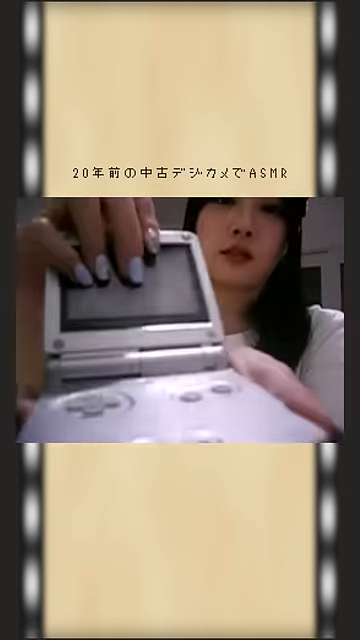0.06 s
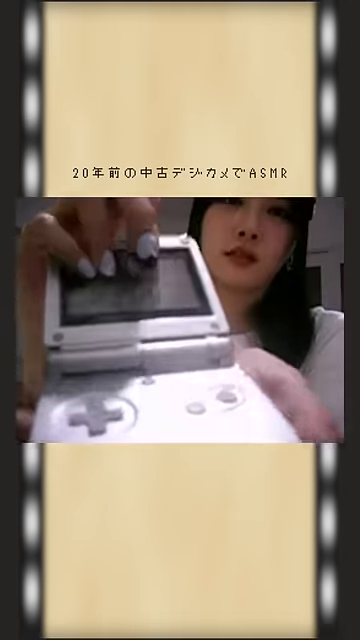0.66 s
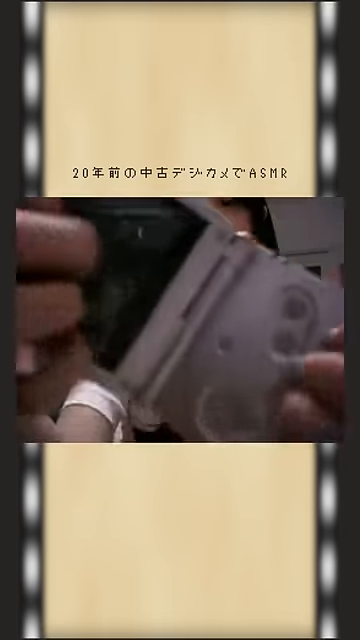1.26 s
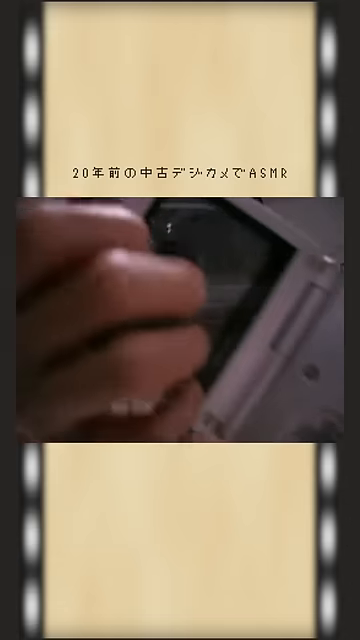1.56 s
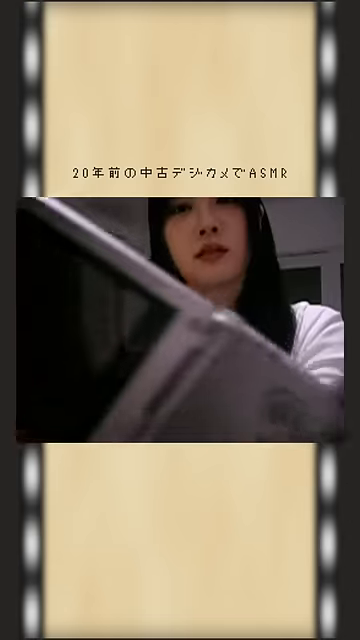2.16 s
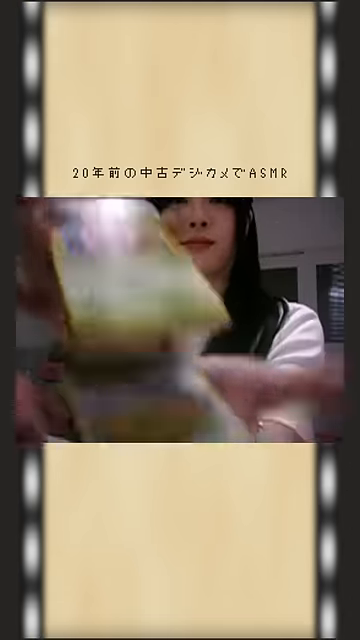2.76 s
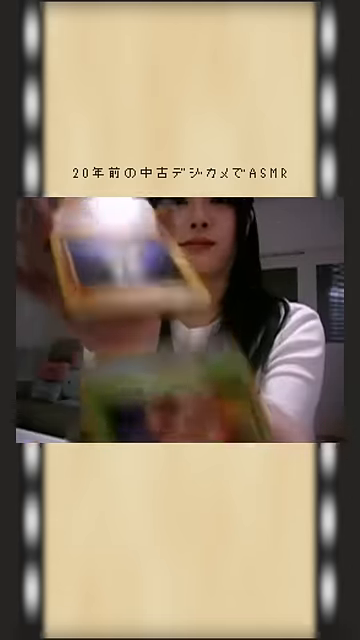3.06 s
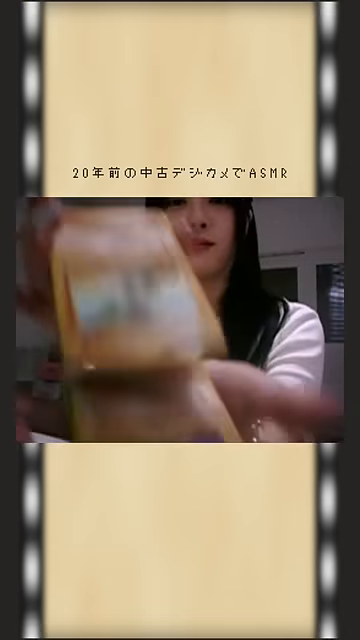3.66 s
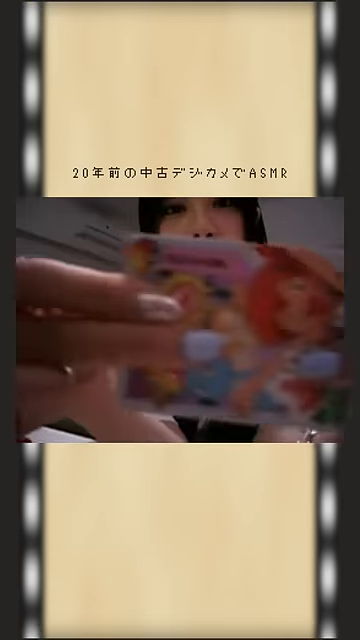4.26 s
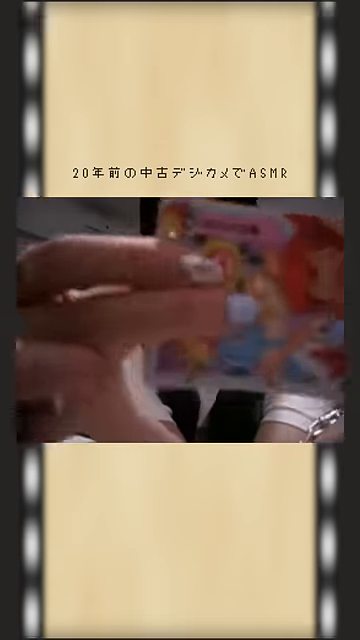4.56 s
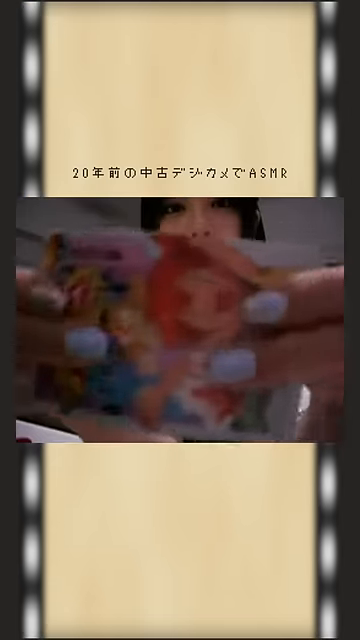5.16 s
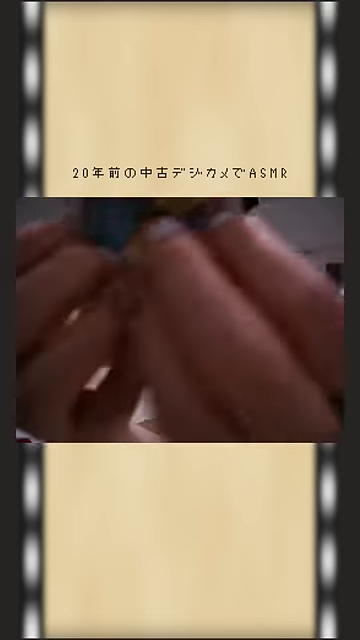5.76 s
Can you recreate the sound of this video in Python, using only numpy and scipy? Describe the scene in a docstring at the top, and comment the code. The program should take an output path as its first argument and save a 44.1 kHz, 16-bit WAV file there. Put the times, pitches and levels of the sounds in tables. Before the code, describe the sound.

Close, muffled hinge snaps and quick nail taps on plastic, then soft card slides and five loud pops of a bending plastic card.

```python
"""Taps, snaps and pops of plastic

Close to an old camera, a handheld game console's lid snaps twice in its hinge and long fingernails tap
the shell; each impact excites damped modes. Trading cards slide off a stack with a swish of friction,
a thin plastic card is flexed until it buckles in five loud pops, and nails click again.
The camera passes little above 4 kHz and adds its own hiss and hum."""
import sys
import numpy as np
from scipy import signal
from scipy.fft import rfft, irfft
from scipy.io import wavfile

SR = 44100
rng = np.random.default_rng(int(sys.argv[2]) if len(sys.argv) > 2 else 0)


def put_to_file(sound):
    """Save the sound as 16-bit audio at rate SR, in the file named by the first command-line argument."""
    columns = np.atleast_2d(sound).T  # one column per channel
    safe = np.clip(columns, -1, 1)
    whole_steps = np.round(safe * 32767)
    wavfile.write(sys.argv[1], SR, whole_steps.astype(np.int16))


N = 256220

# Spectra of the camera's hiss and the hands' rumble: (frequency [Hz], relative density [dB])
HISS_SPECTRUM = [(53, -42.5), (90, -2), (164, -4), (224, -1), (277, -4.5), (359, 0), (416, -6), (604, -4),
                 (1000, -15), (1360, -14.5), (1530, -12), (2370, -9), (2880, -6.5), (3560, -8), (4400, -27),
                 (5720, -72), (9680, -120)]
RUMBLE_SPECTRUM = [(5, -9), (15, 5), (35, -1), (60, -10.5), (130, -16.5), (250, -36), (600, -57),
                   (2000, -92)]
# Tones of the camera's hum: (frequency [Hz], rms level [dB])
HUM_TONES = [(220, -54), (361, -57), (2890, -60), (3130, -60), (3440, -61)]
# Envelope of the rumble: (time [s], relative level [dB])
RUMBLE_ENVELOPE = [(0.0, -45.5), (2.3, -40), (2.62, -48.5), (3.57, -50.5), (4.59, -52), (5.32, -53.5),
                   (5.81, -47)]
# Nail taps: (time [s], relative level [dB], click centre [Hz], panel clack [dB], case knock [dB])
# Clack and knock are relative to the click: near 0 for a square hit, far below for a glancing one.
NAIL_TAPS = [(0.3435, -25.5, 3000.0, -20.5, -20.5), (0.345, -18.5, 2820, -17.5, -26.5),
             (0.6904, -27.5, 3300.0, -20.0, -21.5), (0.7018, -27.5, 2550.0, -24, -27),
             (0.787, -30, 2900.0, -36, -7.5), (0.7942, -17.5, 3150.0, -7.5, -16.5),
             (0.9723, -24.0, 3200.0, -9.5, -17.5), (0.9836, -24.5, 2250.0, -12, -11.5),
             (1.0045, -22, 2490, -18.5, -12.5), (1.0336, -21, 2610, -7.5, -10),
             (1.0916, -21.5, 2960, -18.5, -18), (1.105, -27, 3300.0, -3, -9),
             (1.1566, -25.0, 2350.0, -11, -12.5), (1.166, -25, 2700, -14.5, -19),
             (1.196, -19.5, 2550.0, -6, -10.5), (1.2215, -18.5, 3010, -6, -20.5),
             (1.2323, -12.5, 2400.0, -22.5, -7.5), (1.2935, -23.0, 3400.0, -3.5, -7),
             (1.3162, -23.5, 2900, -21.5, -17.5), (1.3838, -23.5, 2530, -17, -9),
             (1.407, -15, 2850.0, -8, -9), (1.4106, -16, 2470, 1, -2), (1.4526, -21, 3050.0, -7, -10),
             (1.4734, -22.5, 3250.0, -2.5, -6), (1.5413, -21.5, 2700.0, -17, -10.5),
             (1.592, -18, 2900.0, -10.5, -8), (1.603, -14.5, 2370, -3.5, -6.5),
             (1.6595, -21.5, 2850.0, -4.5, -13), (1.6625, -20, 3200, -10.5, -11),
             (1.6666, -18.5, 2920, -10.5, -8.5), (1.7323, -22, 2800.0, -10.5, -7.5),
             (1.792, -17.5, 2750.0, -17.5, -10.5), (1.7983, -16.0, 2950.0, -4, -7),
             (1.8026, -21, 2980, -29.5, -19), (1.8582, -20.5, 3400, -7.5, -9),
             (1.8844, -26, 3050.0, -10.5, -10.5), (1.9048, -27.5, 3000.0, -14.5, -7),
             (1.9689, -23, 2870, -11.5, -14), (2.0151, -24.0, 2450.0, -24, -20),
             (2.0163, -13.5, 2700, -10, -14), (2.0186, -19, 3230, -12.5, -15.5),
             (2.0982, -25.5, 3550.0, -5.5, -8), (2.1341, -19.5, 3270, -6.5, -13.5),
             (2.1387, -27.0, 2720, -12, -6.5), (2.1548, -25, 2700.0, -6, -10),
             (2.2342, -15.5, 2555, -22, -16.5), (2.2914, -30, 3450.0, -6, -7),
             (2.3262, -30.5, 2900, -41, -27.5), (2.3763, -14, 2700.0, -16, -11.5),
             (2.4171, -32, 3200.0, -11.0, -6), (2.4385, -25, 3600, -11, -23.0),
             (2.4435, -16.5, 2570, -8.0, -10.5), (2.4534, -19.5, 2410, -2.5, -8),
             (5.737, -16, 2750.0, -17, -22), (5.737, -23, 2900, -25, 2.5), (5.742, -26, 2900, -13, -6),
             (5.7509, -18, 2450.0, -20, -8), (5.8034, -19, 2690, -20.0, -6)]
# Modes of the hand-damped shell and of the lid: (frequency [Hz], level [dB], T60 [s])
SHELL_MODES = [(305, -5.5, 0.013), (480, 0, 0.047), (740, -1.5, 0.011), (980, -6.5, 0.006),
               (1480, 6, 0.0082), (1780, 1.5, 0.0065), (2250, 1, 0.0065), (2450, 6.5, 0.0066),
               (3070, 2, 0.019), (3113, 0.5, 0.0095), (3400, 10.5, 0.011), (3860, -5, 0.0028)]
LID_MODES = [(420, -0.5, 0.01), (760, 1, 0.014), (1050, -3.5, .008), (1491, -2.5, .011),
             (1720, -1.5, 0.0039), (2180, -0.5, 0.01), (2616, 4, 0.012), (3060, -2, .009),
             (3470, -0.5, 0.0062), (3540, 2, .011), (4210, -1.5, 0.013)]
# Hinge contacts: (time [s], level [dB], click centre [Hz], lid clack [dB re click])
HINGE_CONTACTS = [(0.4378, -14.5, 3500, -4), (0.4384, -7, 3367, -5.5), (0.4404, -17.5, 3000, -12.5),
                  (0.4477, -22.5, 3367, -13.5), (0.8174, -10.5, 2884, -12.5), (0.8192, -6.5, 2950, -12),
                  (0.828, -25.5, 3100, -14)]
# Thin ticks: (time [s], relative peak [dB])
TICK_EVENTS = [(.9622, -28), (2.497, -36.5), (3.9483, -20), (5.7334, -10)]
# A faint nail tap, then card slides with light clicks:
# (mid time [s], half length [s], swish [dB], click [dB], clack [dB re click])
TAP_THEN_SLIDES = [(2.499, 0.0047, -47, -32.5, -25), (2.565, 0.0076, -38.5, -35.5, -8),
                   (2.6315, 0.019, -45.5, -24.5, -21), (2.84, 0.004, -43.5, -37, -21),
                   (2.8492, 0.012, -31, -27, -11), (3.1637, 0.0082, -32.5, -33.5, -20.5),
                   (3.41, 0.04, -40, -37, -22.5), (3.555, 0.0034, -41, -39.5, -20),
                   (3.616, 0.0058, -41, -36.5, -21), (3.7403, 0.004, -41, -35, -11.5),
                   (3.75, 0.015, -30, -28.5, -8), (3.927, 0.028, -37, -36, -18)]
# Spectrum of the friction: (frequency [Hz], relative density [dB])
FRICTION_SPECTRUM = [(500, -11), (1300, -32), (2200, -20), (3100, 14.5), (3700, 2.5), (5000, -19)]
# Loud and faint pops: (time [s], peak [dB], cutoff [Hz], pitch from tension [ratio], twisting mode [dB])
CARD_POPS = [(4.1397, -0.5, 2400, 1.0, -19), (4.2938, -30.5, 342, 1.0, -20), (4.351, -34, 300, 1.0, -21),
             (4.4989, 1, 3080, 1.04, -4), (4.678, -31, 451, 1.0, -23), (4.8817, -3, 1950, 0.98, -8),
             (5.045, -43, 400, 1.0, -22), (5.252, -1.5, 3970, 0.956, -21), (5.6326, -6.5, 1400, 0.97, -9)]
# Modes of the flexed card: (frequency [Hz], level [dB], T60 [s])
CARD_MODES = [(143, -12, 0.015), (270, -2, 0.023), (402, -2, 0.021), (464, 2, 0.023), (880, -14, 0.0062),
              (1216, -3.5, 0.012), (1560, -8, 0.015), (1910, -2.5, 0.011), (2440, 4, 0.011),
              (3400, 1, 0.0073)]
# Spectrum of the room's reflections: (frequency [Hz], relative level [dB])
ROOM_SPECTRUM = [(100, -13.5), (900, 3), (1600, 0), (3200, 2), (4500, -3)]
LIGHT_CLICK_HZ = 2990


def amp(db):
    """Amplitude grows tenfold for every 20 dB."""
    return 10 ** (np.asarray(db) / 20)


def unit_rms(x):
    """Normalisation brings the mean power to 1."""
    return x / np.sqrt(np.mean(x ** 2) + 1e-20)


def add(mix, start_s, sound):
    """Superposition: a sound adds to the mix from its start time on."""
    part = mix[max(round(start_s * SR), 0):][:len(sound)]
    part += sound[:len(part)]


def coloured(x, spectrum):
    """Linear filtering weights each frequency by the spectrum; the result has rms 1."""
    hz, db = np.transpose(spectrum)
    f = np.fft.rfftfreq(len(x), 1 / SR)
    gain = amp(np.interp(np.log(f + 1), np.log(hz + 1), db))
    return unit_rms(irfft(rfft(x) * gain, len(x)))


def drift(step_s):
    """Interpolation between random values gives a slow fluctuation of rms 1."""
    knots = np.arange(0, N / SR + 1, step_s)
    return unit_rms(np.interp(np.arange(N) / SR, knots, rng.standard_normal(len(knots))))


def low_pass(x, hz, size):
    """Convolution with a windowed sinc cuts the treble steeply."""
    return signal.oaconvolve(x, signal.firwin(size, hz, window=("kaiser", 8), fs=SR), "same")


def camera_noise(hiss_db=-44, flutter_db=1.25, waver_hz=1.7):
    """Random modulation: the camera's hiss flutters in amplitude and its hum wavers in frequency."""
    hiss = amp(hiss_db + flutter_db * drift(0.016)) * coloured(rng.standard_normal(N), HISS_SPECTRUM)
    hum = np.zeros(N)
    for hz, db in HUM_TONES:
        phase = 2 * np.pi * np.cumsum(hz + waver_hz * drift(0.05)) / SR
        hum += amp(db) * unit_rms(np.sin(phase))
    return hiss + hum


def hand_rumble(gain_db=6):
    """Handling noise: moving hands make a low rumble that swells and fades."""
    level_db = np.interp(np.arange(N) / SR, *np.transpose(RUMBLE_ENVELOPE)) + gain_db
    return amp(level_db) * coloured(rng.standard_normal(N), RUMBLE_SPECTRUM)


def band(response, hz, octaves, lag_rad=1.0, trail_s_per_hz=3.2e-7):
    """One band of an impact sound: the pressure dips before it peaks, and the treble is heard a little after
    the lows."""
    f = np.fft.rfftfreq(len(response), 1 / SR) + 1
    lag = lag_rad + np.pi * trail_s_per_hz * (f - LIGHT_CLICK_HZ) ** 2
    gain = np.exp(-(np.log2(f / hz) / octaves) ** 2)
    part = irfft(rfft(response) * gain * np.exp(-1j * lag), len(response))
    return part * np.sqrt(0.004 * SR / np.sum(part ** 2))  # the energy of 4 ms at rms 1


def impacts(contacts, modes, scatter_db, detune, click_octaves, clack_hz, clack_octaves, push_db):
    """Impulse response: a short push, then free vibration whose modal weights vary with the spot hit."""
    hz, db, t60 = np.transpose(modes)[:, :, None]
    t, out = np.arange(2048) / SR, np.zeros(N)
    spots = rng.standard_normal((len(contacts), 2, len(modes), 1))
    for (time_s, level_db, click_hz, clack_db, knock_db), (weight, shift) in zip(contacts, spots):
        envelopes = amp(db + scatter_db * weight - 60 * t / t60)
        ring = (envelopes * np.cos(2 * np.pi * hz * (1 + detune * shift) * t)).sum(0)
        push = amp(push_db) * (t == 0)
        response = np.r_[np.zeros_like(t), ring / np.linalg.norm(ring) + push]
        click = band(response, click_hz, click_octaves)
        clack = amp(clack_db) * band(response, clack_hz, clack_octaves)
        knock = amp(knock_db) * band(response, hz=470, octaves=0.95)  # the hollow case
        add(out, time_s - t[-1], amp(level_db) * (click + clack + knock))
    return out


def dry_clicks(contacts):
    """Damping: in the hand-held shell the push outweighs the ring, so a contact sounds dry."""
    return amp(-1) * impacts(contacts, SHELL_MODES, scatter_db=7.5, detune=0.049, click_octaves=0.45,
                             clack_hz=1400, clack_octaves=0.66, push_db=8)


def nail_taps(rebound_s=0.0031, rebound_db=-22, spread_db=2.5, graze_db=-12.5):
    """Elastic rebound: each nail strikes the shell and bounces once, only grazing it."""
    contacts = []
    for tap in NAIL_TAPS:
        time_s, level_db = tap[:2]
        lateness, strength = rng.uniform(-0.66, 1, 2)
        bounce_s = time_s + rebound_s * (1 + lateness / 2)
        bounce_db = level_db + rebound_db + spread_db * strength
        contacts += [tap, (bounce_s, bounce_db, LIGHT_CLICK_HZ, graze_db, graze_db)]
    return dry_clicks(contacts)


def hinge_snaps(click_octaves, push_db, knock_db=-16.5):
    """Impact excitation: the hinge catches, seats and rattles, and each contact rings the lid."""
    contacts = [(*contact, knock_db) for contact in HINGE_CONTACTS]
    return impacts(contacts, LID_MODES, scatter_db=3.6, detune=0.01, click_octaves=click_octaves,
                   clack_hz=1670, clack_octaves=0.8 * click_octaves, push_db=push_db)


def ticks(decay_s=0.000095):
    """A brief pulse has a wide spectrum: these thin ticks reach the top octave."""
    pulse = np.exp(-np.arange(200) / SR / decay_s)
    out = np.zeros(N)
    for time_s, db in TICK_EVENTS:
        add(out, time_s, amp(db) * pulse)
    return out


def swishes(catches_per_s=800, spread_db=4, swish_share=0.18):
    """Friction: tiny catches over a soft swish, faint at a nail tap, then as card rubs on card."""
    t = np.arange(N) / SR
    strengths = rng.standard_normal(N) * amp(spread_db * np.minimum(rng.exponential(1, N), 3))
    catches = unit_rms(strengths * (rng.random(N) < catches_per_s / SR))
    friction = coloured(catches + swish_share * rng.standard_normal(N), FRICTION_SPECTRUM)
    envelope = sum(amp(db) * np.exp(-((t - mid) / half) ** 2) for mid, half, db, _, _ in TAP_THEN_SLIDES)
    return friction * envelope


def light_clicks(click_hz=2880, knock_db=-20.5):
    """Light impacts give much click and little knock: a faint nail tap, then the sliding cards."""
    return dry_clicks([(time_s, click_db, click_hz, clack_db, knock_db)
                       for time_s, _, _, click_db, clack_db in TAP_THEN_SLIDES])


def card_pops(buckle_s=0.00022, suction_db=3.5, scatter_db=1.0, twist_hz=624, twist_t60=0.012):
    """Snap-through buckling: the bent card gives way, drawing air after it, then rings in its modes."""
    t, out = np.arange(3000) / SR, np.zeros(N)
    until_snap = t[::-1] / buckle_s
    suction = -amp(suction_db) * until_snap * np.exp(1 - until_snap)
    for time_s, peak_db, cutoff_hz, pitch_ratio, twist_db in CARD_POPS:
        twist = (twist_hz, twist_db, twist_t60)  # excited by an uneven bend
        hz, db, t60 = np.transpose(CARD_MODES + [twist])[:, :, None]
        envelopes = amp(db + scatter_db * rng.standard_normal(db.shape) - 60 * t / t60)
        ring = (envelopes * np.sin(2 * np.pi * hz * pitch_ratio * t)).sum(0)
        pop = signal.sosfilt(signal.butter(4, cutoff_hz, fs=SR, output="sos"), np.r_[suction, ring])
        add(out, time_s - t[-1], amp(peak_db) * pop / abs(pop).max())
    return out


def reflections(x, delay_s, t60):
    """Reverberation: dense random echoes begin after a delay and decay exponentially."""
    t = np.arange(SR // 2) / SR
    echoes = rng.standard_normal(len(t)) * (rng.random(len(t)) < 0.15)
    tail = coloured(echoes, ROOM_SPECTRUM) * amp(-60 * t / t60) * (t > delay_s)
    return signal.fftconvolve(x, tail / np.linalg.norm(tail))[:N]


def scene():
    """Direct and reverberant fields add; the loud hinge snaps have a stronger room tail."""
    snaps = hinge_snaps(click_octaves=0.45, push_db=-3)
    # Sound from all sides of the lid reaches the walls, which evens out its modes.
    diffuse_snaps = hinge_snaps(click_octaves=0.55, push_db=18)
    near = nail_taps() + light_clicks() + card_pops() + swishes()
    early = amp(-15) * reflections(near + snaps, delay_s=0.0012, t60=0.028)  # off hands and camera
    late = reflections(amp(-23) * near + amp(-18) * diffuse_snaps, delay_s=0.014, t60=0.43)
    return (near + snaps + early + late + camera_noise() + hand_rumble())[None]


def record(dry, fizz_db=-49, top_hiss_db=-84):
    """Band limiting and saturation: the camera cuts treble, adds fizz and hiss, and flattens peaks."""
    narrow = low_pass(dry[0], hz=4304, size=181)
    fizz_spectrum = [(4000, 6.5), (5500, -3), (7000, -5), (9800, -2), (11000, -7.5), (16000, -13.5)]
    top_spectrum = [(5000, -1), (6000, -2.5), (10200, -2.5), (10900, -13), (16000, -14.5)]
    fizz = amp(fizz_db) * abs(narrow) * coloured(rng.standard_normal(N), fizz_spectrum)
    top_hiss = amp(top_hiss_db) * coloured(rng.standard_normal(N), top_spectrum)
    mix = narrow + fizz + top_hiss + ticks()  # the ticks keep their treble
    clipped = mix / (1 + mix ** 24) ** (1 / 24)
    return low_pass(clipped, hz=16500, size=255)[None]


dry = scene()
out = record(dry)
put_to_file(out)
```